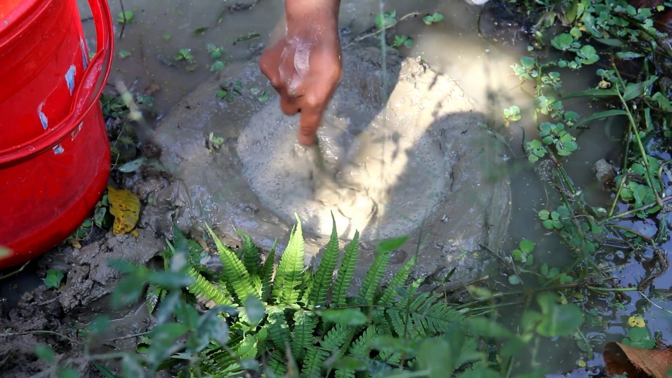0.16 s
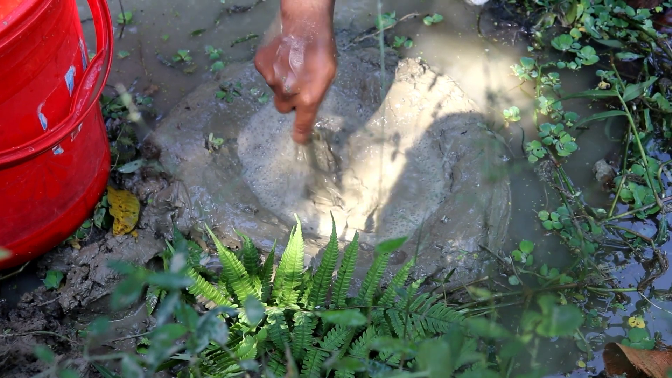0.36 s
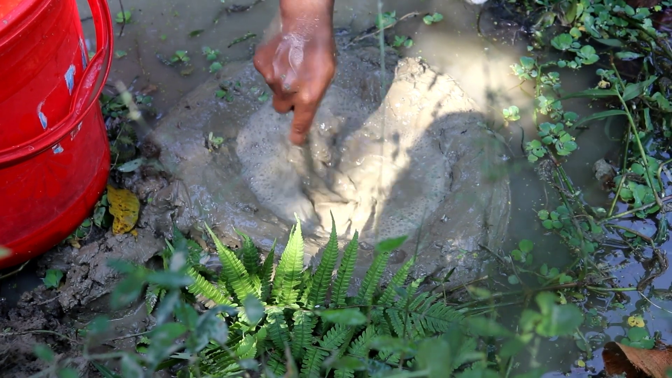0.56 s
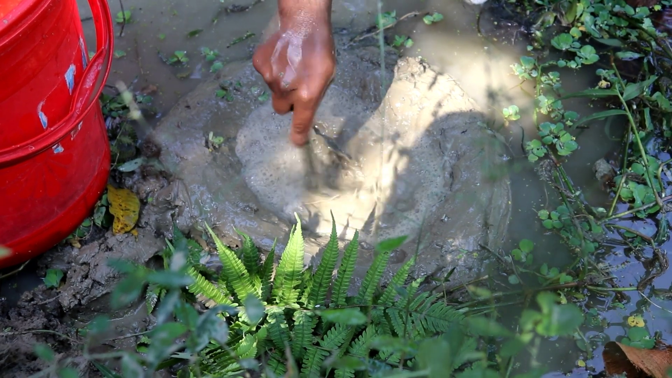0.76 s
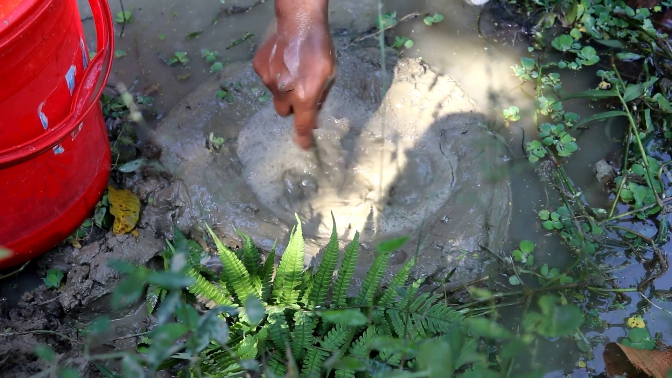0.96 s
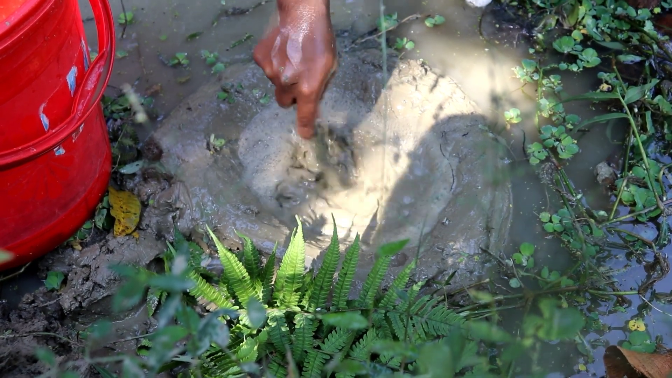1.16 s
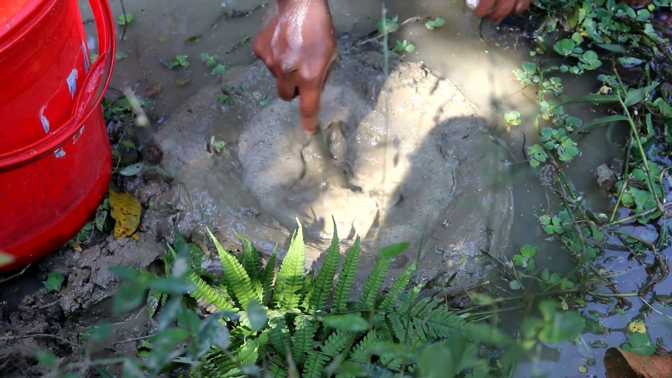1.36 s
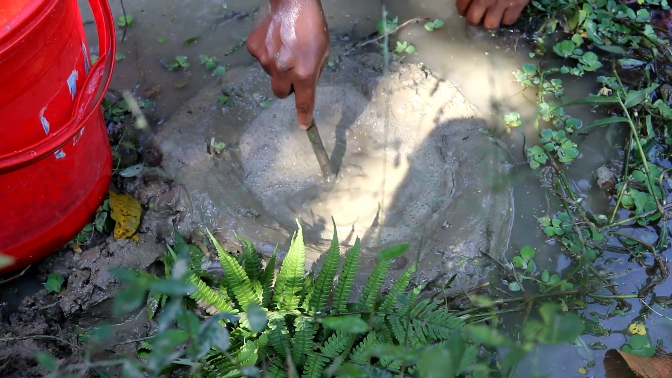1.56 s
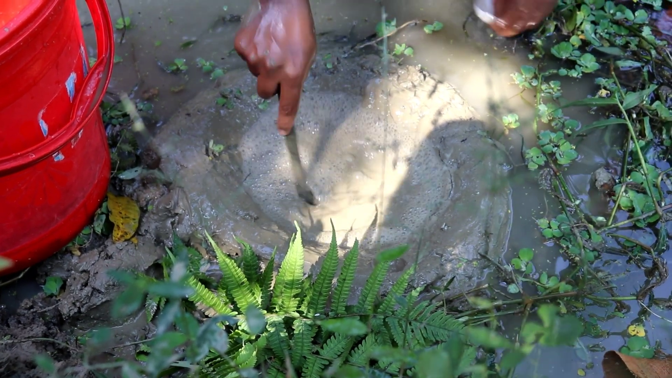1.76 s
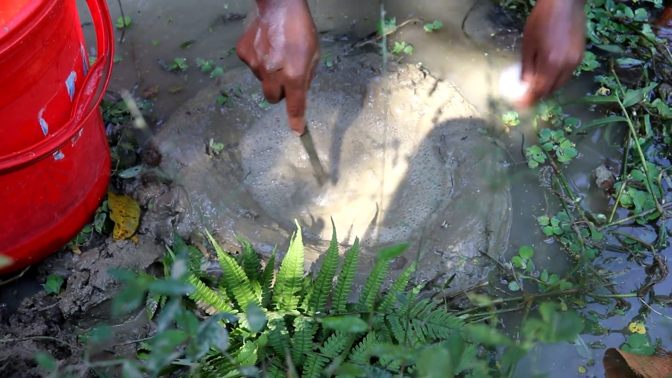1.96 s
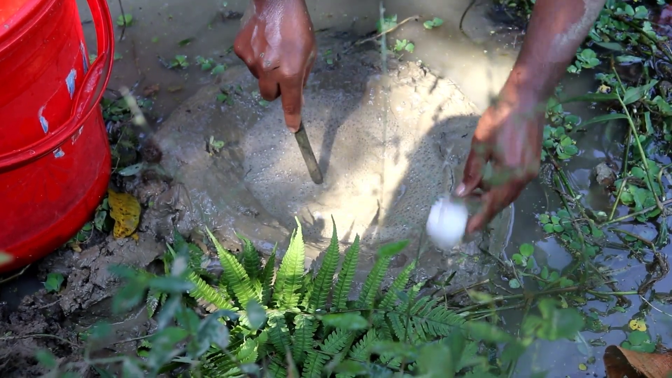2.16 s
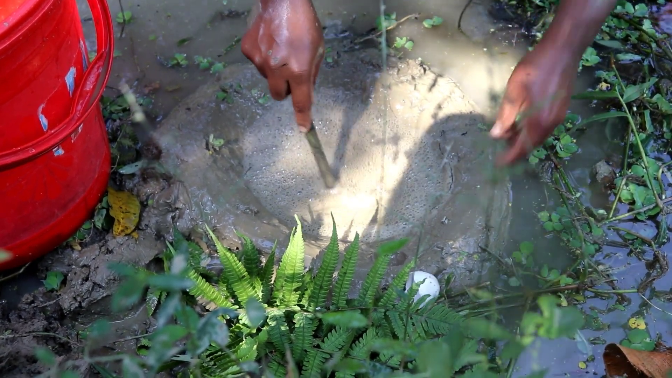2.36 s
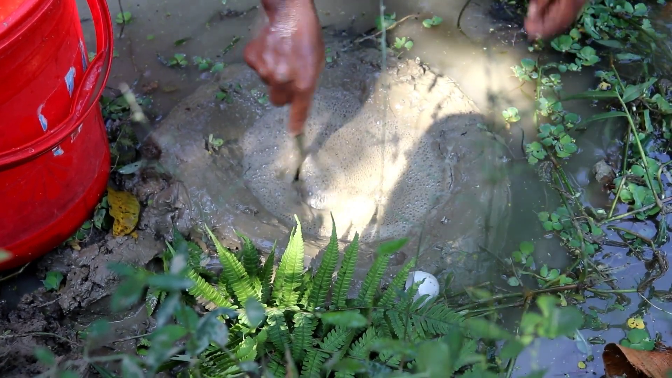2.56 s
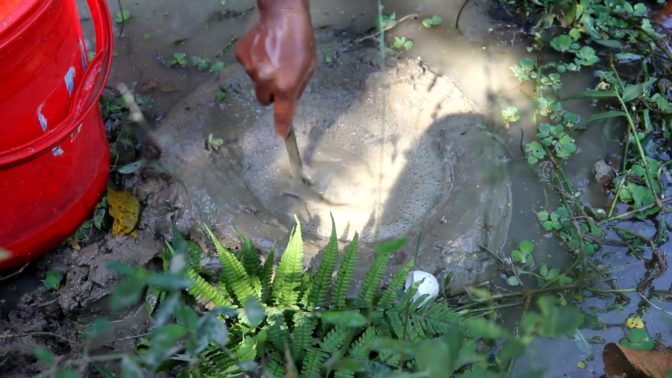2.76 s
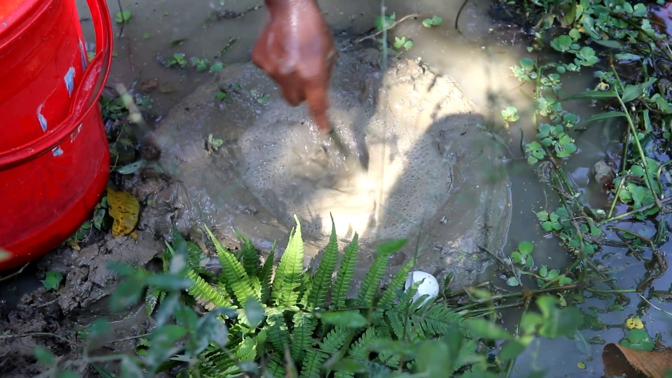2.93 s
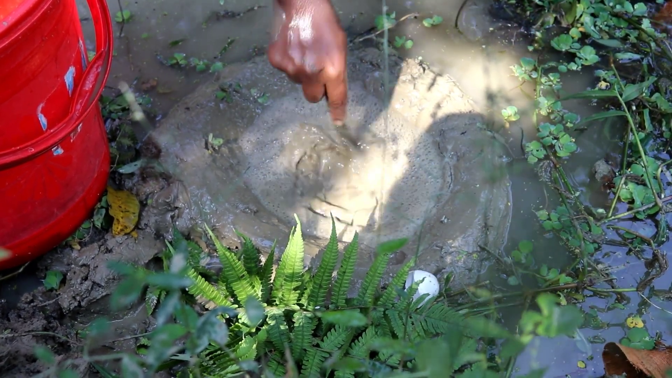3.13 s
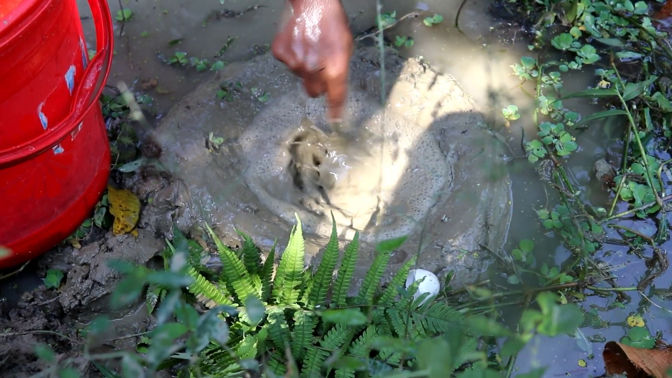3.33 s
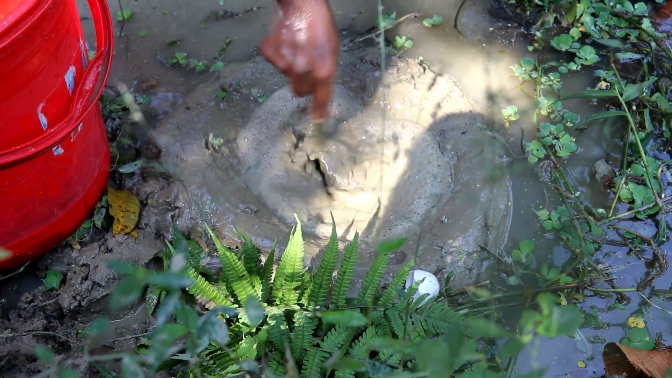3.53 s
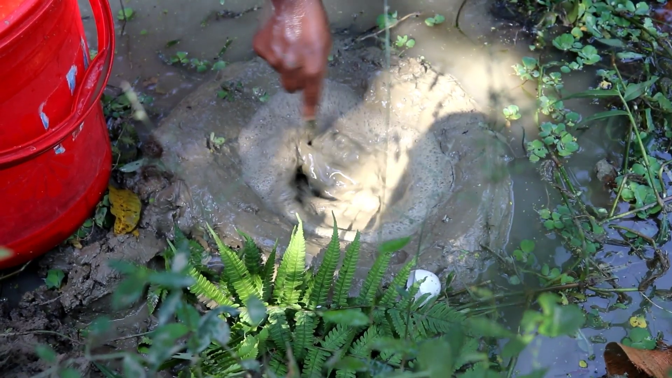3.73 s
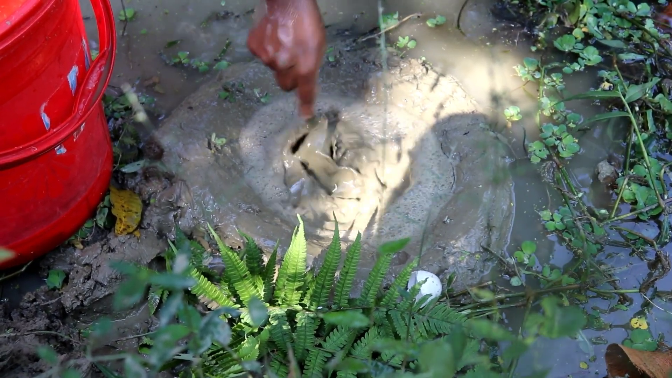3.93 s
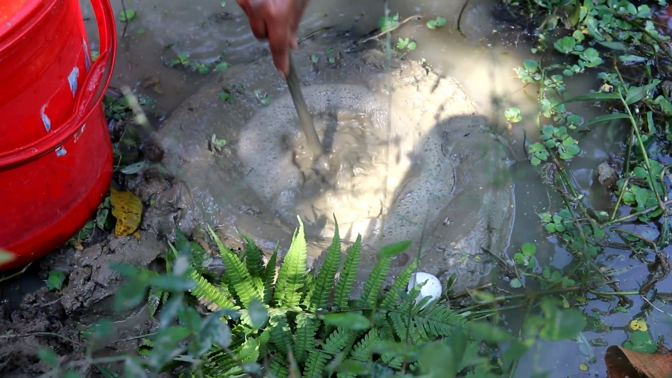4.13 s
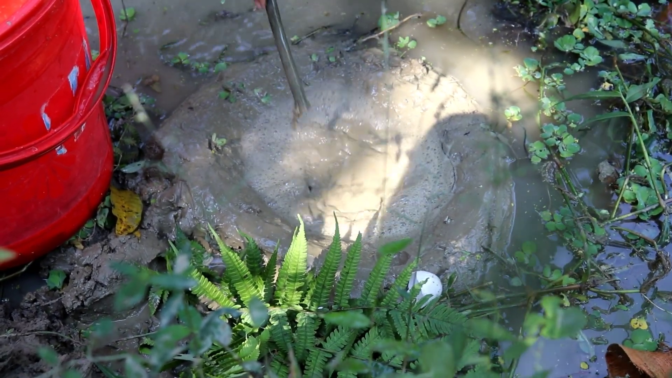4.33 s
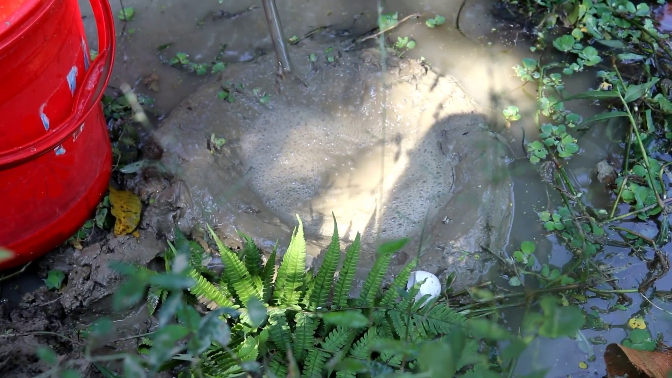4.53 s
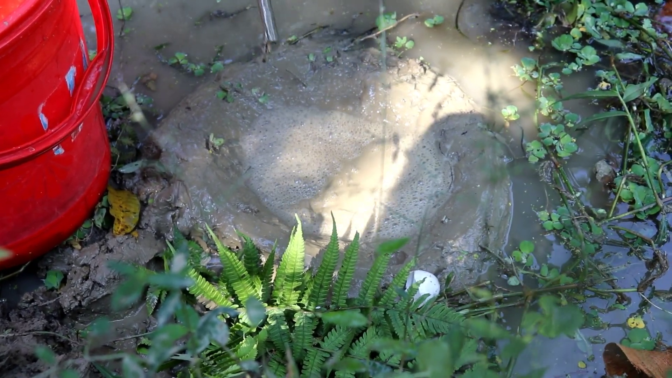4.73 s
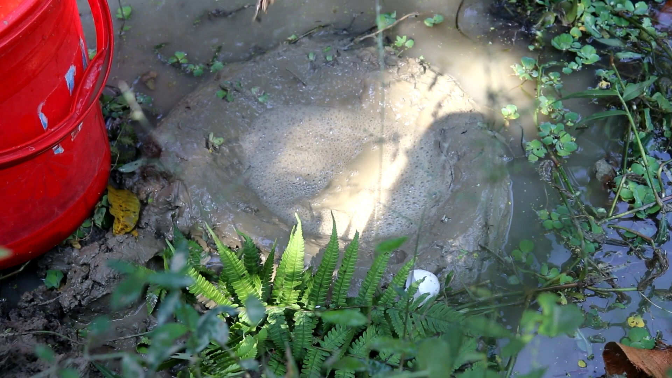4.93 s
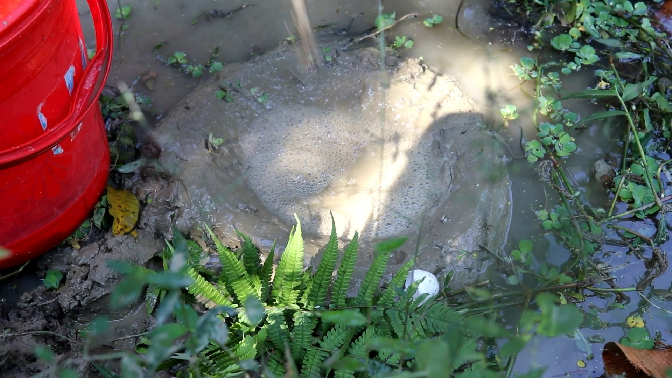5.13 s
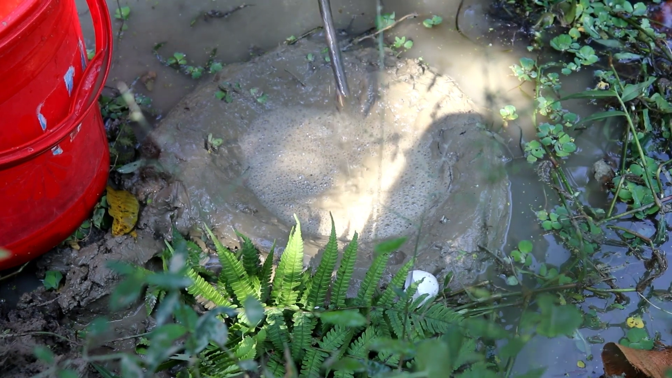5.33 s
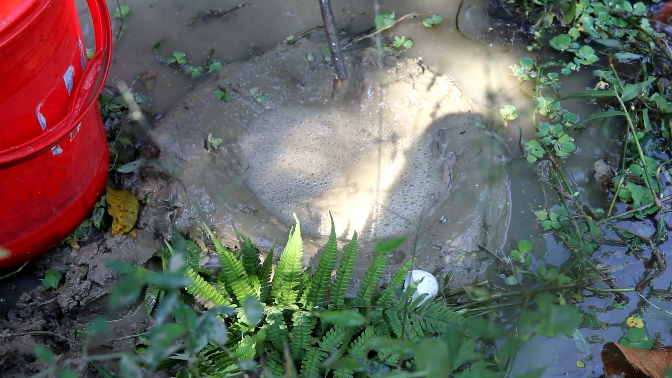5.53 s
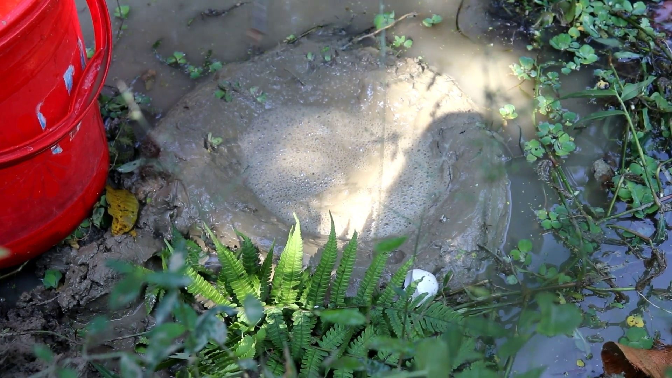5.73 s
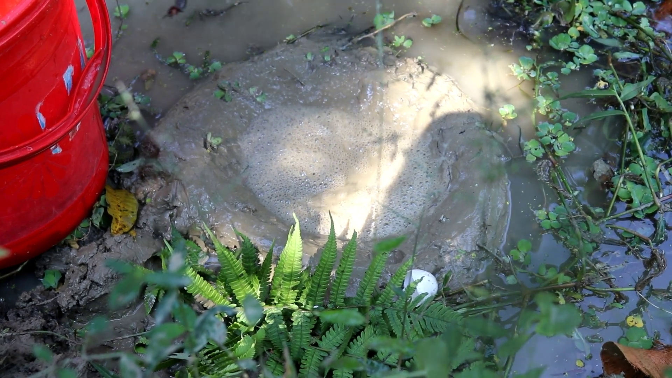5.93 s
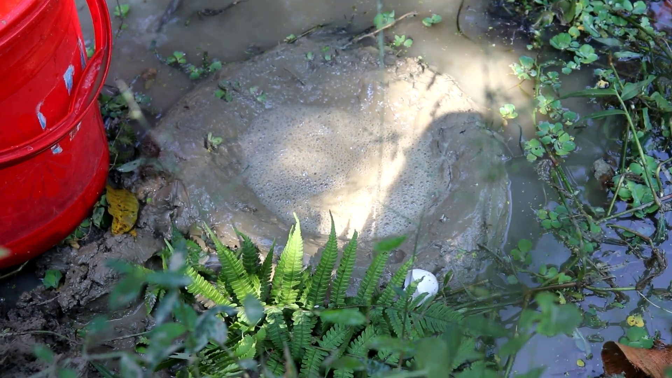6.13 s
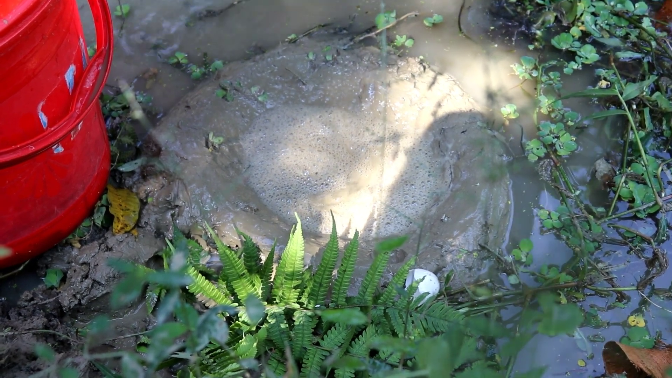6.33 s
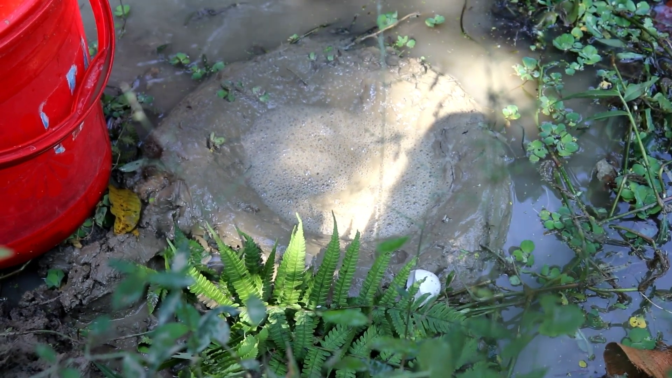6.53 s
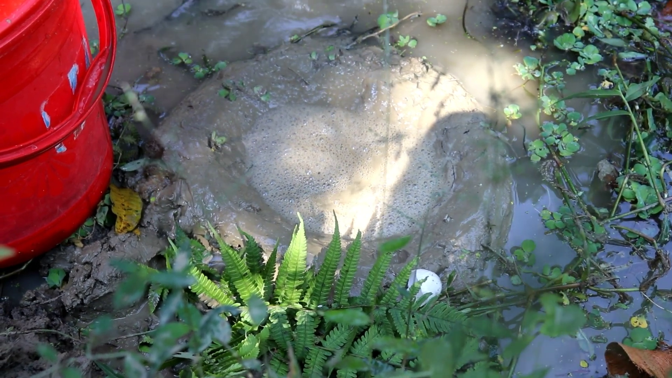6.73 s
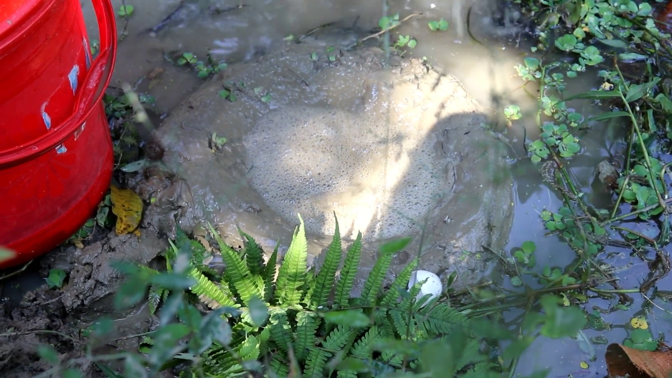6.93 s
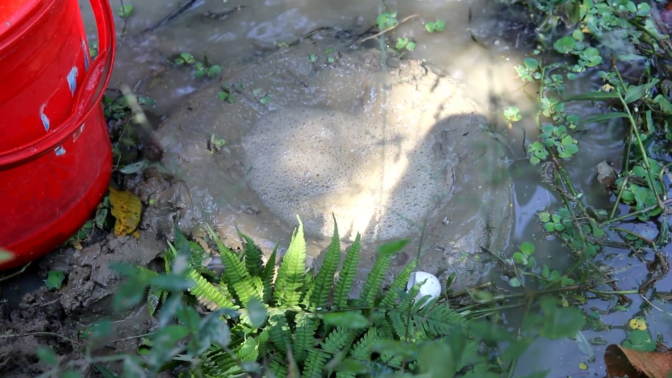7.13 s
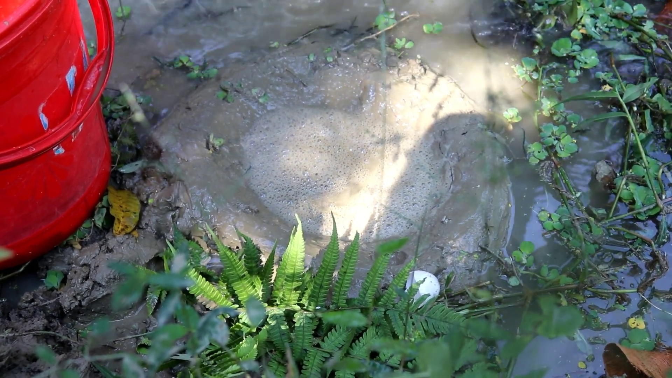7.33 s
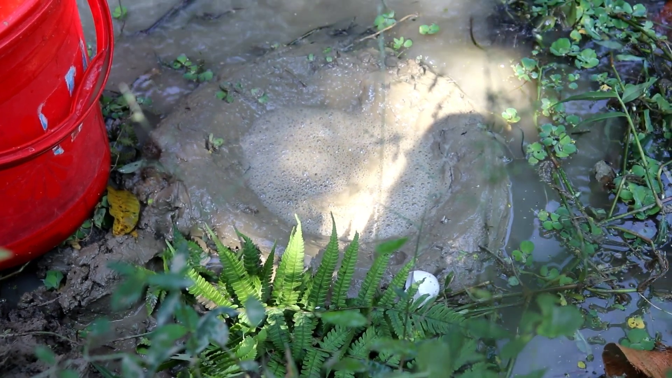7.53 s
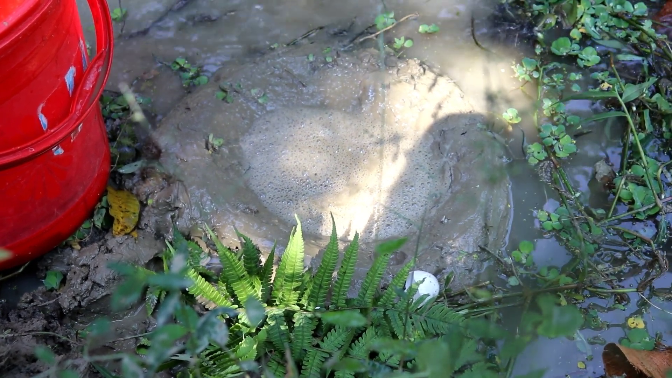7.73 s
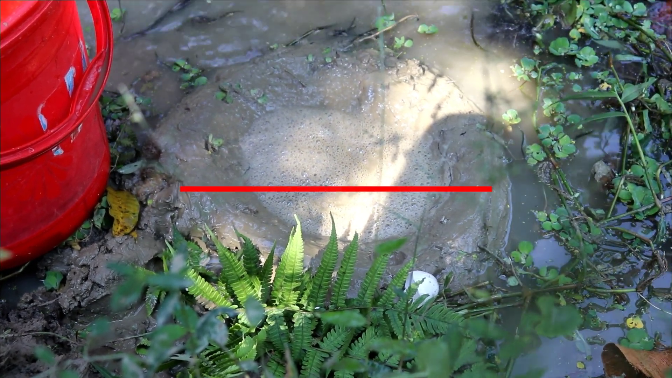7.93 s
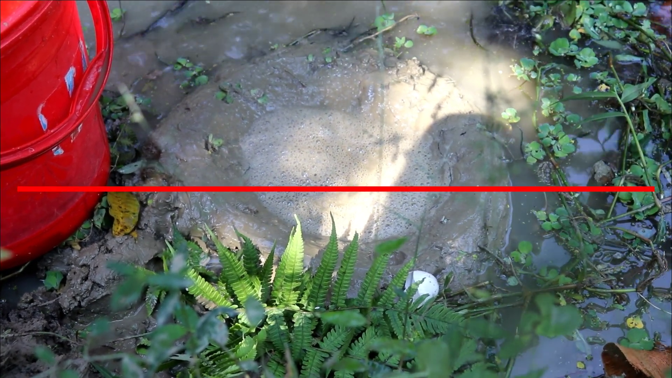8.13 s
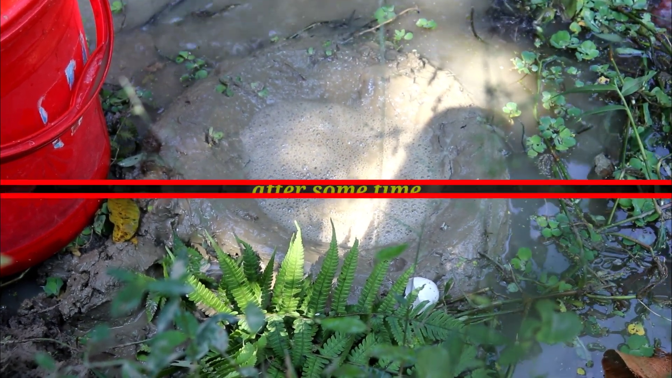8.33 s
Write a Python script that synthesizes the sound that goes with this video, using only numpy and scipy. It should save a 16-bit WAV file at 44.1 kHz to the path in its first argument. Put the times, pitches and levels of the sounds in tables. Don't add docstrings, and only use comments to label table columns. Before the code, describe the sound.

A stick churns muddy water in a small hole with gloops, plinks and spatter, pauses, stirs again, then rinses briefly while birds trill and a cicada buzzes.

```python
import sys
import numpy as np
from scipy import signal
from scipy.fft import rfft, irfft, next_fast_len
from scipy.io import wavfile
from scipy.ndimage import uniform_filter1d

SR = 44100
rng = np.random.default_rng(int(sys.argv[2]) if len(sys.argv) > 2 else 0)


def undo_db(level):
    steps = np.asarray(level, float) / 20
    return 10 ** steps


def generate_wav(signal):
    frames = np.transpose(np.atleast_2d(signal))
    scaled = np.clip(frames, -1, 1) * 32767
    pcm = np.round(scaled).astype(np.int16)
    wavfile.write(sys.argv[1], SR, pcm)


N = 373968

# time in seconds, peak in dB, pitch in Hz.
GLOOPS = [(0.03, -21.5, 632), (0.054, -22.5, 550), (0.087, -23, 1035), (0.155, -23.5, 605),
          (0.213, -14.5, 813), (0.284, -22, 880), (0.313, -27, 673), (0.434, -28.5, 734),
          (0.494, -29.5, 836), (0.54, -23.5, 613), (0.608, -19, 632), (0.741, -27.5, 604),
          (0.814, -14.5, 643), (0.888, -33, 866), (0.907, -22.5, 824), (1.048, -31, 617), (1.094, -26, 780),
          (1.118, -21.5, 895), (1.224, -30, 660), (1.31, -36, 518), (1.35, -22, 740), (1.43, -28, 690),
          (1.615, -26, 766), (1.993, -26, 650), (2.083, -40, 614),
          (2.76, -29, 903), (2.867, -38, 770), (2.989, -36.5, 596), (3.058, -29.5, 600),
                (3.152, -28, 620), (3.232, -24.5, 627), (3.463, -32, 1000), (3.478, -19, 954),
                (3.487, -21, 892), (3.536, -36, 850), (3.663, -29, 1014), (3.714, -23, 620),
                (3.922, -26, 705), (3.932, -17, 569), (4.033, -27, 785), (4.1, -24, 1140),
          (0.344, -32.5, 660), (0.627, -18.5, 610), (0.647, -25.5, 662), (0.682, -32, 826),
         (1.065, -34, 603), (1.404, -30, 1120), (3.014, -32.5, 630), (3.137, -36.5, 657),
         (3.172, -33.5, 544), (3.242, -21.5, 599), (3.261, -24.5, 660), (3.305, -37, 706),
         (3.377, -39, 1050), (3.51, -29, 1026), (3.855, -37, 804), (3.995, -33.5, 895),
         (4.122, -26.5, 1100), (4.137, -25.5, 1290), (4.149, -39, 660), (6.624, -38, 780)]
# time in seconds, peak in dB, pitch in Hz.
PLINKS = [(0.254, -20.5, 2980), (0.3396, -19, 2790), (0.4196, -17, 1745), (0.4617, -21, 3150),
          (0.5378, -26.5, 3370), (0.625, -17.5, 1550), (0.7269, -19, 3190), (0.8003, -13.5, 2080),
          (1.426, -18, 3150), (1.1658, -24, 3010), (1.2602, -17, 1750), (1.4317, -13, 1750),
          (1.5916, -31, 1650), (1.8058, -26, 2660), (2.383, -25, 1840), (2.7326, -29, 2830),
          (3.058, -30, 2100), (3.133, -18, 1630), (3.273, -21, 2710), (3.306, -24.5, 2250),
          (3.4905, -13.5, 2150), (3.4845, -13.5, 1830), (3.484, -9.5, 3500), (4.11, -18.5, 5280),
          (3.14, -20, 1730), (3.5722, -24.5, 1460), (3.683, -22.5, 1560), (3.8234, -21, 3460),
          (4.0185, -17.5, 5650), (3.924, -21.5, 1697), (3.9364, -17, 2720), (4.0986, -16.5, 1920),
          (4.2025, -30, 1800), (4.2567, -33, 1830)]
# time in seconds, peak in dB, pitch in Hz.
PLIPS = [(0.0797, -30, 3560), (0.1065, -24.5, 1420), (0.133, -23.5, 1750), (0.2297, -28, 3160),
         (0.322, -24.5, 1630), (0.35, -21, 3000), (0.372, -23, 2480), (0.492, -37, 2940),
         (0.514, -29, 1470), (0.7048, -26, 2100), (0.8964, -27, 3050), (0.913, -23, 1760),
         (0.945, -25, 1900), (1.056, -26, 1730), (1.131, -31, 1670), (1.2306, -26.5, 1670),
         (1.3355, -35, 3590), (1.3548, -25.5, 3570), (1.3798, -28, 3470), (1.4016, -31, 1830),
         (1.451, -19.5, 3300), (1.518, -33, 1920), (1.5449, -26.5, 3300), (2.872, -32, 1900),
         (2.9595, -36, 3120), (3.016, -37, 3260), (3.036, -26.5, 1890), (3.1166, -38, 1720),
         (3.5064, -23, 2620), (3.5518, -38, 1520), (3.642, -26.5, 1590), (3.6568, -22.5, 2440),
         (3.7933, -26, 2110), (3.8543, -30, 1540), (3.892, -24, 1940), (3.9514, -19, 2170),
         (4.024, -24, 3220), (4.0606, -22, 2440), (4.123, -21.5, 2310), (4.1454, -21.5, 1620)]
# time in seconds, peak in dB, pitch in Hz.
RINSE = [(6.4016, -21, 3680), (6.5931, -23.5, 1980), (6.61, -24.5, 774), (6.6199, -23.5, 1330),
         (6.696, -18, 770), (6.7045, -19, 2350), (6.8, -41, 486), (6.842, -34, 1110), (6.8772, -20, 3820),
         (6.9094, -16.5, 3860), (6.9488, -13.5, 1240), (6.958, -14.5, 3850), (7.5517, -27, 4640),
         (8.289, -34, 3150), (6.975, -31, 5800), (7.0496, -29.5, 1690), (7.1394, -14, 2850),
         (7.199, -18, 2910), (7.301, -30, 3530), (7.5076, -29, 3300), (7.7132, -20.5, 2115),
         (7.988, -27.5, 5000), (8.247, -30.5, 1660), (8.287, -37, 1230)]
# time in seconds, peak in dB, top octave against the rest in dB.
SPLATS = [(0.091, -22, 12), (0.152, -23, -13), (0.216, -24.5, -25), (0.31, -24, -29), (0.3415, -20, -21),
          (0.42, -17.5, -25), (0.5655, -18.5, 13), (0.608, -15, -27), (0.7476, -21.5, 2), (0.811, -20, -13),
          (1.252, -18, -18), (1.3476, -21, -6), (1.4284, -17, -28), (1.551, -28.5, -28),
          (1.802, -24.5, -14), (2.729, -32.5, -10), (3.365, -29, -36), (3.481, -15.5, -25),
          (3.878, -24.5, -19), (4.02, -22, -35), (4.104, -23, -1), (6.6114, -20.5, -47), (6.642, -20.5, 5),
          (6.842, -23.5, -11), (6.927, -24, 10), (7.049, -25.5, -6), (7.141, -14.5, 19),
          (7.195, -16.5, -16), (7.2436, -22.5, -4), (7.2978, -22, -18)]

POCKETS = GLOOPS


def evened(x):
    return x / np.sqrt(np.mean(x ** 2) + 1e-20)


def read(points, hz):
    f, value = np.transpose(points)
    return np.interp(np.log(hz + 1), np.log(f + 1), value)


def curve(rows, column):
    return np.interp(np.arange(N) / SR, [r[0] for r in rows], [r[column] for r in rows])


def colour(x, points):
    size = next_fast_len(x.shape[-1])
    gain = undo_db(read(points, np.fft.rfftfreq(size, 1 / SR)))
    return irfft(rfft(x, size) * gain, size)[..., :x.shape[-1]]


def slow_noise(count, width):
    return evened(uniform_filter1d(rng.standard_normal(count), width))


def glide_tone(hz):
    return np.sin(2 * np.pi * np.cumsum(hz) / SR)


def swells(rows):
    t = np.arange(N) / SR
    return sum(undo_db(db) * np.exp(-((t - s) / width_s) ** 2) for s, width_s, db in rows)


def add(mix, s, sound, pan_db=0.):
    part = mix[:, max(round(s * SR), 0):][:, :np.shape(sound)[-1]]
    sides = undo_db(np.array([[pan_db / 2], [-pan_db / 2]]))
    part += (sides * sound)[:, :part.shape[1]]


def scatter(x, t60, wet_db, gap_s):
    taps = rng.choice([-1., 1.], (2, SR // 2)) * (rng.random((2, SR // 2)) < 2000 / SR)
    t = np.arange(SR // 2) / SR
    both, apart = taps * undo_db(-60 * t / t60) * (t > gap_s)
    apart = colour(apart, [(500, -9.5), (2500, 1.5)])
    taps = np.array([both + apart, both - apart])
    taps = taps / np.linalg.norm(taps[0])
    return x + undo_db(wet_db) * signal.fftconvolve(x, taps, axes=1)[:, :N]


def bubble(hz, cycles, glide, rise):
    u = np.arange(int(1.8 * cycles * SR / hz)) * hz / SR / cycles
    shape = (1 - np.exp(-(u / rise) ** 2)) * np.exp(-2.5 * u ** 1.5)
    return shape / shape.max() * np.sin(2 * np.pi * cycles * (u + glide * u ** 2 / 2))


def pockets(rows, rings, glide, rise, rough, lift_db):
    out = np.zeros((2, N))
    for (s, db, hz), (a, b, *near) in zip(rows, rng.random((len(rows), 8))):
        cycles = rings * max(hz / 1500, 1) ** .55
        level = undo_db(db + lift_db)
        main = bubble(hz * (1 - 0.58 * glide * b), cycles * (0.52 + .5 * a), glide * b, rise)
        add(out, s - 0.82 / hz, level * main)
        for off, late in np.reshape(near, (3, 2)):
            mate = bubble(hz * (.84 + .28 * off + .1 * late), .6 * cycles, glide, rise)
            late_s = 1.3 * cycles / hz * (late - .15)
            add(out, s + late_s, rough * level * mate, 6 * (off - .5))
    return out


def slaps():
    # frequency in Hz, density in dB per Hz.
    smack = [(150, 2.5), (400, 5), (1500, 6), (4000, -5), (9000, -13)]
    peak_s = 0.0021
    out, t = np.zeros((2, N)), np.arange(1500) / SR
    shape = (t / peak_s) * np.exp(1 - t / peak_s)
    for s, db, _ in POCKETS:
        noise = evened(colour(rng.standard_normal(len(t)), smack))
        add(out, s - .002, undo_db(db - 14) * noise * shape)
    return out


def sweeps():
    # start in seconds, peak in dB, first pitch in Hz, last pitch in Hz, length in seconds.
    glides = [(1.615, -37.5, 1100, 4500, 0.022), (4.2, -30, 1600, 2300, 0.01),
              (6.621, -29, 1100, 2100, 0.018), (7.131, -24, 1300, 3500, 0.0074),
              (3.7, -50, 2980, 3700, .012), (4.672, -50, 3300, 3500, 0.012),
              (4.857, -50, 3000, 3400, 0.014), (5.457, -51, 3100, 3700, .012), (6.2, -49, 3300, 3240, .012),
              (5.168, -50, 2700, 3400, 0.012), (6.281, -43, 4400, 4300, 0.0038),
              (6.302, -43, 660, 890, 0.009), (3.5, -60, 4000, 4750, 0.031), (4.82, -57, 3600, 4600, .015),
              (3.53, -30.5, 390, 1270, 0.0227), (1.944, -27, 2900, 1640, 0.0155),
              (6.707, -32.5, 860, 1470, 0.023), (5.806, -59, 4400, 4200, .02),
              (2.28, -59, 4050, 4550, 0.045)]
    out = np.zeros((2, N))
    for s, db, from_hz, to_hz, length_s in glides:
        hz = np.geomspace(from_hz, to_hz, round(length_s * SR))
        add(out, s, undo_db(db) * glide_tone(hz) * np.hanning(len(hz)) ** 0.38)
    return out


def swarm(lo_hz, hi_hz, cycles, per_s, spread_db, width_db, climb, count=50):
    clumps = undo_db(4.54 * slow_noise(N, 600))
    out, each = np.zeros((2, N)), 1200
    sizes = zip(np.geomspace(lo_hz, hi_hz, count), rng.random((count, 2)))
    for k, (hz, (a, b)) in enumerate(sizes):
        if k % 10 == 0:
            clumps = np.roll(clumps, SR)
        when, used, large, side = rng.random((each, 4)).T
        at, hits = (when * N).astype(int), np.zeros((2, N))
        present = used < per_s / count * N / SR / each
        size = present * clumps[at] * undo_db(-spread_db * np.log(large + 0.035))
        hits[:, at] = size * undo_db(width_db * np.outer([1, -1], 2 * side - 1))
        grain = bubble(hz, cycles * (.5 + a), climb * b ** 2, 0.32) * np.sqrt(hz)
        out += signal.oaconvolve(hits, grain[None], axes=1)[:, :N]
    return evened(out)


def bouts(lift_db):
    # time in seconds, effort in dB.
    stir = [
        [(0.0, -44.5), (0.1, -43.5), (0.5, -40.5), (0.8, -37.5), (1.0, -42.5), (1.4, -39), (1.6, -53),
         (1.75, -60), (2.15, -53.5)],
        [(2.68, -53.5), (2.86, -50.5), (3.26, -45), (3.4, -44), (3.66, -41), (3.96, -41.5), (4.16, -35.5),
         (4.26, -47), (4.36, -61.5)],
        [(6.585, -46), (6.78, -51), (6.9, -36), (6.97, -44), (7.03, -55), (7.11, -53.5), (7.42, -55.5),
         (7.54, -52), (7.8, -65)],
    ]
    t = np.arange(N) / SR
    return sum(undo_db(np.interp(t, *np.transpose(rows), -150, -150) + up_db)
               for rows, up_db in zip(stir, lift_db))


def wake(rows, lift_db):
    rise_s, t60_s = 0.018, 0.25
    power, t = np.zeros(N), np.arange(SR // 2) / SR
    for s, db, _ in rows:
        power[max(round((s - rise_s) * SR), 0)] = undo_db(2 * (db + lift_db))
    swell = np.minimum(t / rise_s, 1) ** 2 * undo_db(-2 * 60 * t / t60_s)
    return np.sqrt(abs(signal.fftconvolve(power, swell)[:N]))


def spray(drops):
    # time in seconds, peak in dB, top octave against the rest in dB.
    drips = [(1.986, -30, -5), (2.3837, -39, -23), (5.178, -40, -21), (5.349, -19.5, -12),
             (5.3732, -27, -1), (5.4076, -34, -4), (6.219, -27, -27), (6.338, -25.5, -18), (6.398, -20, -2),
             (7.471, -29, -7), (7.5487, -37, -3), (7.681, -30, -9), (7.713, -28, -9), (7.896, -36, -23),
             (8.253, -32.5, -7), (8.287, -34, -22)]
    bursts = SPLATS + drips
    out, t = np.zeros((2, N)), np.arange(3000) / SR
    for (s, db, top_db), at in zip(bursts, rng.random(len(bursts))):
        tilt = [(250, -34), (1500, 5.5), (4000, 2.0), (8000, 4.5), (13000, 0.72 * (top_db + 9.5))]
        start = int(at * (N - len(t)))
        crackle = drops[:, start:start + len(t)]
        hiss = 0.52 * rng.standard_normal((2, len(t)))
        burst = evened(colour(crackle + hiss, tilt))
        u = t / (0.005 * undo_db(0.15 * (db + 26.5)))
        add(out, s - .004, undo_db(db - 2.0) * burst * u ** 2.52 * np.exp(-u ** 2.37))
    return out


def churn():
    # frequency in Hz, density in dB per Hz.
    slosh_tone = [(650, -50), (1100, 3.5), (1390, 0.5), (1870, 6.5), (3550, 8.5), (4090, -4.5), (5500, 1.5),
                  (7150, -59), (12100, -120)]
    # frequency in Hz, density in dB per Hz.
    fizz_tone = [(2350, -61), (4000, -6.5), (5220, -5.5), (9120, -3.5), (10700, -8.5), (14800, -10),
                 (16000, -31)]
    # hollow against slosh in dB, fizz against slosh in dB.
    depth = [
        (-7.5, -12),
        (-8, -10),
        (-23, -7),
    ]
    froth = swarm(1150, 4600, 9, 3200, 3.3, 5.5, .12)
    hollow = swarm(520, 1050, 6.5, 600, 2.6, 1.5, .2, count=20)
    drops = swarm(3500, 15500, 9, 4500, 4.4, 8.5, .15)
    hollow_db, fizz_db = np.transpose(depth)
    plinks = PLINKS + PLIPS + [row for row in RINSE if row[0] < 7]
    slosh = evened(colour(froth, slosh_tone)) * np.hypot(bouts(0 * fizz_db), wake(plinks, -20))
    fizz = evened(colour(drops, fizz_tone)) * np.hypot(bouts(fizz_db), wake(SPLATS, -22)) * undo_db(4.0)
    hollow = hollow * np.hypot(bouts(hollow_db), wake(POCKETS, -29.5))
    return slosh + hollow + fizz + spray(drops)


def pond():
    # time in seconds, peak in dB.
    gulps = [(0.048, -30), (0.152, -33), (0.537, -29.5), (0.609, -30), (0.732, -36), (1.05, -27.5),
             (1.065, -33), (1.27, -28.5), (1.291, -34), (1.348, -31), (1.43, -33), (2.928, -39.5),
             (3.493, -26), (3.51, -30.5), (3.522, -33), (3.933, -38), (0.345, -41), (1.995, -40),
             (3.238, -42.5), (6.698, -41)]
    # time in seconds, peak in dB, pitch in Hz.
    rinse_plips = [(6.6001, -27, 1720), (6.6338, -20.5, 2800), (6.62, -24, 6200), (6.683, -30, 4700),
                   (6.7448, -28, 2820), (6.787, -35, 4470), (6.8167, -35.5, 4520), (6.8387, -26, 3950),
                   (6.893, -28, 1820), (6.978, -25, 1596), (7.0844, -33, 2600), (7.1514, -35, 2840),
                   (7.168, -25, 4000), (7.246, -22, 4700), (7.3442, -32.5, 4500), (7.471, -33, 2740),
                   (7.5512, -36, 2340), (7.5752, -34, 2720), (7.6839, -36, 4000), (7.898, -35, 5300),]
    # frequency in Hz, left against right in dB.
    sides = [(60, -11), (150, 1), (380, -1), (950, 3), (2380, -3), (5980, -0.5), (15000, -4.5)]
    hole_hz = 323
    water = pockets(POCKETS, rings=6.6, glide=.14, rise=.5, rough=.36, lift_db=-.5)
    deep = [(s, db, hole_hz) for s, db in gulps]
    water += pockets(deep, rings=5, glide=.45, rise=.3, rough=.25, lift_db=-3)
    small = PLINKS + RINSE + PLIPS + rinse_plips
    water += pockets(small, rings=8, glide=.07, rise=.5, rough=.5, lift_db=-5)
    water += slaps() + sweeps() + churn()
    left = colour(water[0], [(hz, db / 2) for hz, db in sides])
    right = colour(water[1], [(hz, -db / 2) for hz, db in sides])
    water = colour(np.array([left, right]), [(60, -18), (170, 1.5)])
    return scatter(water, 0.099, -5.5, .002)


def trills():
    # middle note in seconds, peak in dB, gap between notes in seconds.
    calls = [(2.585, -43.5, 0.045), (2.872, -35.5, 0.043), (3.138, -34, 0.045), (3.400, -33.5, 0.041),
             (3.661, -32.5, 0.032), (3.950, -36, 0.041), (4.247, -35, 0.04), (4.581, -35, 0.044),
             (4.876, -36, 0.046), (5.17, -36, 0.047), (5.475, -35.5, .051), (5.8587, -53.5, 0.043),
             (8.079, -50.5, .045), (8.29, -48, 0.042)]
    out, t = np.zeros((2, N)), np.arange(round(0.055 * SR)) / SR - .018
    shape = np.exp(-(t / 0.0069) ** 2) + 0.041 * np.hanning(len(t))
    note = glide_tone(5200 - 52000 * abs(t + 0.00894)) * shape
    for s, db, gap_s in calls:
        for late_s, step_db in [(-gap_s, -12), (0, -2.5), (gap_s, -1.5)]:
            grain = slow_noise(len(t), 120)
            add(out, s + late_s - .013, undo_db(db + step_db + 2.0 * grain) * note)
    return scatter(out, 0.31, 2.7, 0.0047)


def whistles():
    # start in seconds, length in seconds, first pitch in Hz, last pitch in Hz, level in dB.
    calls = [(1.865, 0.074, 2600, 2280, -44.5), (2.734, 0.075, 3114, 2650, -32),
             (2.882, 0.042, 2000, 1665, -35), (4.733, 0.098, 2966, 2140, -36),
             (5.727, 0.039, 2390, 2340, -50), (5.756, 0.016, 3400, 2680, -44),
             (5.76, 0.049, 2975, 2486, -33.5), (5.814, 0.041, 3080, 2830, -38.5),
             (5.854, 0.04, 2820, 2610, -35.5), (5.878, 0.077, 2220, 2185, -44.5),
             (5.94, .025, 2490, 2580, -44), (5.962, 0.015, 2540, 2920, -37),
             (5.975, 0.015, 2930, 2510, -38), (6.116, 0.032, 3900, 3800, -57), (2.549, .12, 603, 616, -57),
             (2.606, 0.11, 2900, 3020, -52), (2.08, .07, 2920, 2900, -56),
             (6.238, 0.055, 2960, 3080, -45.5), (4.465, 0.059, 2180, 2110, -54),
             (4.675, 0.038, 1800, 2030, -52), (4.861, 0.031, 1960, 1750, -44),
             (5.009, 0.041, 2130, 2160, -45), (5.254, 0.037, 1330, 1530, -51.5),
             (5.23, 0.15, 2910, 3760, -55), (5.511, 0.042, 1490, 1920, -51),
             (5.663, 0.044, 1860, 1900, -52), (7.53, 0.067, 2227, 2300, -41),
             (8.327, 0.14, 3550, 3620, -55), (8.418, 0.062, 1360, 1520, -51),
             (8.445, 0.044, 2930, 2860, -47.5)]
    out = np.zeros((2, N))
    for s, length_s, from_hz, to_hz, db in calls:
        t = np.arange(0, length_s, 1 / SR) / length_s
        hz = from_hz + (to_hz - from_hz) * t ** 0.77
        flutter = slow_noise(len(t), 150)
        tone = glide_tone(hz * (1 + .02 * flutter)) * signal.windows.tukey(len(t), .3)
        add(out, s, undo_db(db - 11.5 * t + 0.95 * flutter) * tone, -2.5)
    return scatter(out, 0.43, -1.5, 0.011)


def chorus():
    # swell in seconds, width in seconds, level in dB.
    far_swells = [(1.95, 0.39, -47.5), (2.5, 0.22, -64), (4.95, 0.19, -47.5), (6.3, 0.17, -44.5),
                  (7.55, 0.059, -41.5), (8.15, 0.12, -44)]
    far = np.zeros((2, N))
    for s, a, b, c, d in rng.random((1100, 5)):
        t = np.arange(0, .012 + .035 * c, 1 / SR)
        hz = 1600 * 2.2 ** a * (1 + .5 * (b - .6) * t / t[-1])
        add(far, s * N / SR, undo_db(11 * d) * glide_tone(hz) * np.hanning(len(t)), 8 * (c - .6))
    return evened(scatter(far, 0.52, 4.6, .003)) * swells(far_swells) * undo_db(-5.0)


def cicada():
    # time in seconds, level in dB, share of the near one that throbs from 0 to 1.
    buzz = [(0, -63.5, 1), (1.9, -61, 0.96), (2.74, -57, 0.7), (2.78, -60, 0), (4.1, -52, 0.35),
            (4.3, -55, 0.4), (4.69, -58, 0.6), (4.72, -51, 0), (5.5, -53.5, 0.24), (6.5, -59, 0.57),
            (7.6, -47, 0.08), (8.48, -52.5, 0.24)]
    turns = np.cumsum(125.1 + .1 * slow_noise(N, 9000)) / SR
    share = np.clip(curve(buzz, 2), 0, 1)
    a, b = rng.standard_normal((2, N))
    ribs = np.array([a, .5 * a + 1.1 * b])
    shell = [(7500, -28), (8200, -13), (8750, -8), (9050, 0), (9350, -9), (10000, -24), (11000, -48)]
    blurred = [(7400, -24), (8200, -5), (9000, -3), (9600, -9), (10200, -24), (11000, -48)]
    near = colour(ribs * 18.0 * share * np.exp(-(turns % 1) / 0.65), shell)
    far = colour(ribs * (1 - share), blurred)
    return evened(near + far) * undo_db(curve(buzz, 1))


def air():
    # frequency in Hz, density in dB per Hz.
    air_tone = [(25, -17), (60, 3), (140, -1.5), (430, -8.5), (1200, -14), (3200, -8.5), (3900, -17.5),
                (4800, -9.5), (5800, -21.5), (8000, -20), (10600, -20), (11500, -30), (15000, -23)]
    # frequency in Hz, left-right likeness from -1 to 1.
    likeness = [(60, 1), (240, 0.87), (950, 0.23), (3770, -0.14), (15000, -0.16)]
    frames, hz = N // 256 + 5, np.fft.rfftfreq(1024, 1 / SR)
    a, b, c, d, patches = rng.standard_normal((frames, 513, 5)).T
    patches = evened(uniform_filter1d(uniform_filter1d(patches, 8, 0), 12, 1))
    same = np.clip(read(likeness, hz), -1, 1)[:, None]
    left = a + 1j * b
    right = same * left + np.sqrt(1 - same ** 2) * (c + 1j * d)
    patchy_db = read([(300, 1), (1500, 2), (4000, 1.5), (7000, 1)], hz)[:, None]
    z = np.array([left, right]) * undo_db(read(air_tone, hz)[:, None] + patchy_db * patches)
    return undo_db(-52.5) * evened(signal.istft(z, nperseg=1024, noverlap=768)[1][:, :N])


def brushes():
    # swell in seconds, width in seconds, level in dB.
    rustles = [
        (7.52, 0.16, -54.5),
        (8.14, 0.12, -52),
        (3, 0.075, -54),
    ]
    # frequency in Hz, density in dB per Hz.
    leaf_tone = [(250, -5), (600, 6.5), (1200, 5), (2800, -4), (4500, -16)]
    grit = rng.standard_normal((2, N)) * undo_db(3.8 * slow_noise(N, 300))
    return evened(colour(grit + 0.69 * grit[::-1], leaf_tone)) * swells(rustles)


def scene():
    return pond() + trills() + whistles() + chorus() + cicada() + air() + brushes()


def roll_off(x):
    return signal.sosfilt(signal.butter(12, 16650, fs=SR, output="sos"), x)


def record(dry):
    # frequency in Hz, gain in dB.
    band_edges = [(22, -22), (48, .1), (340, 1), (440, -5), (560, .1), (15300, .1), (15700, -6),
                  (16100, -60)]
    # time in seconds, gain in dB.
    fade = [(0, 1), (7.9, 1), (8.05, -4.5), (8.48, -4.5)]
    mix = colour(dry, band_edges) * undo_db(curve(fade, 1))
    return roll_off(mix)


dry = scene()
out = record(dry)
generate_wav(out)
```